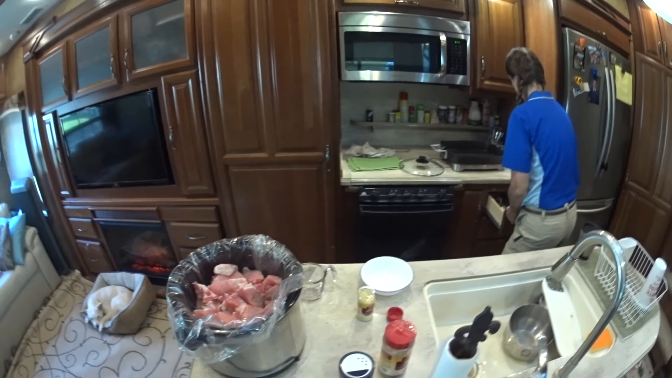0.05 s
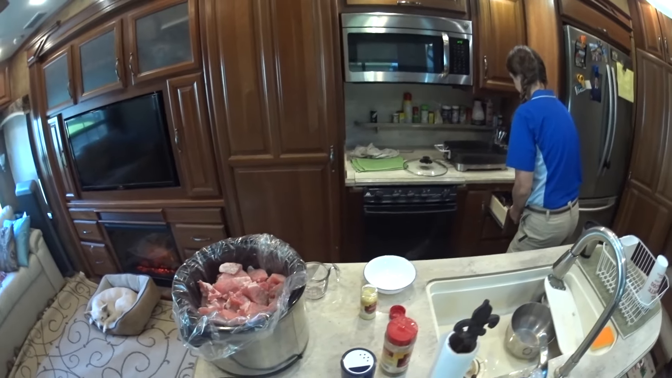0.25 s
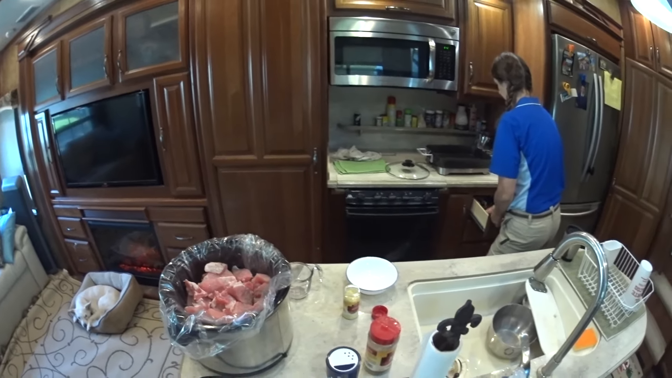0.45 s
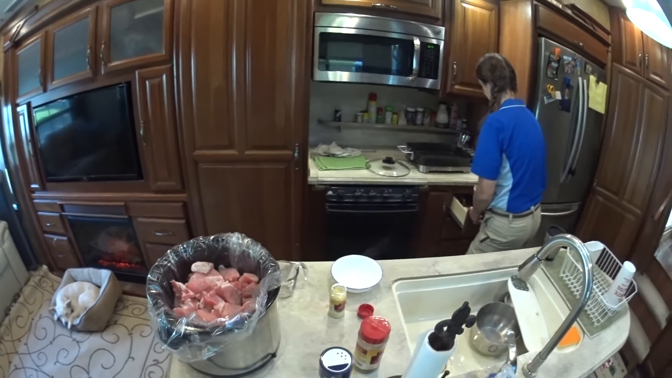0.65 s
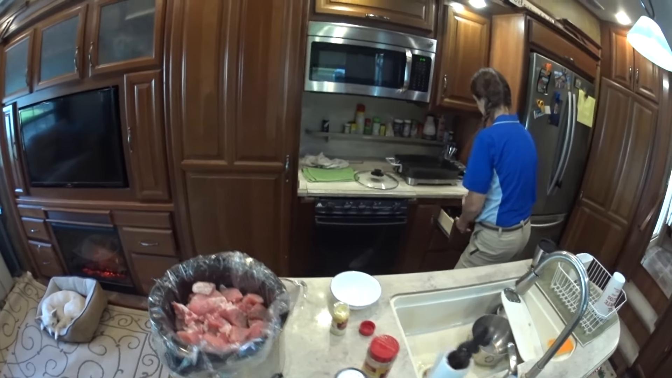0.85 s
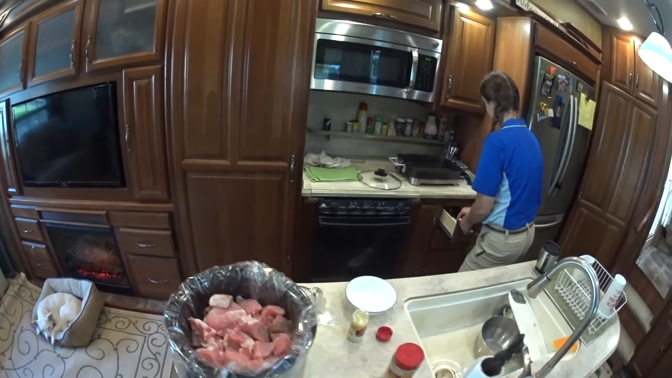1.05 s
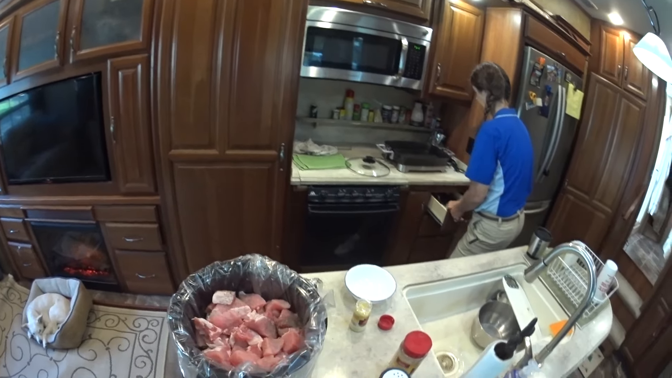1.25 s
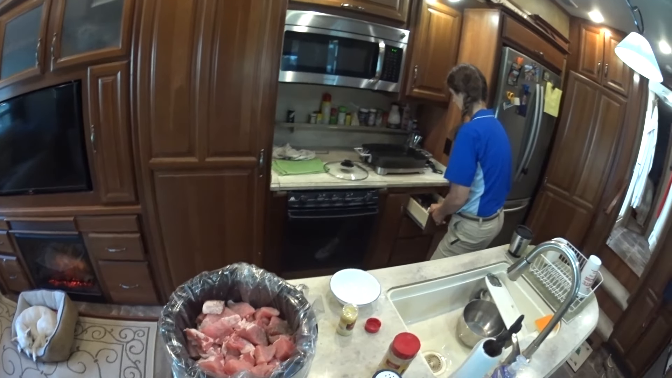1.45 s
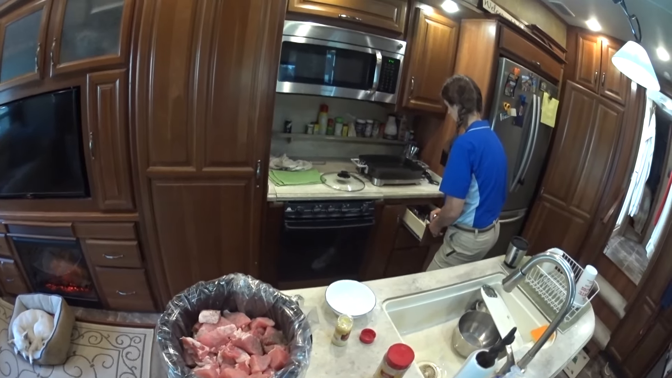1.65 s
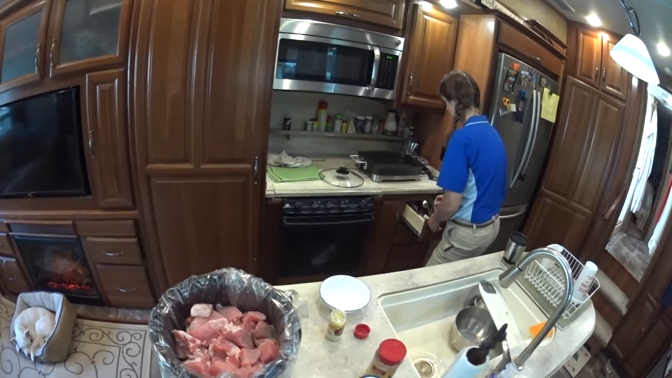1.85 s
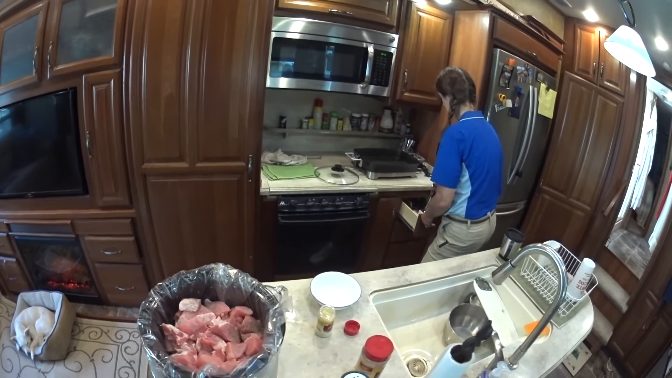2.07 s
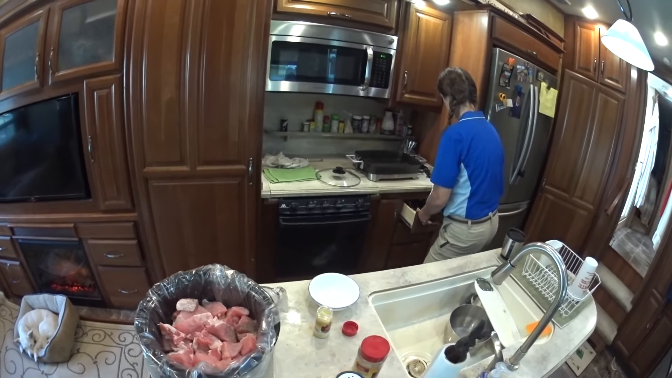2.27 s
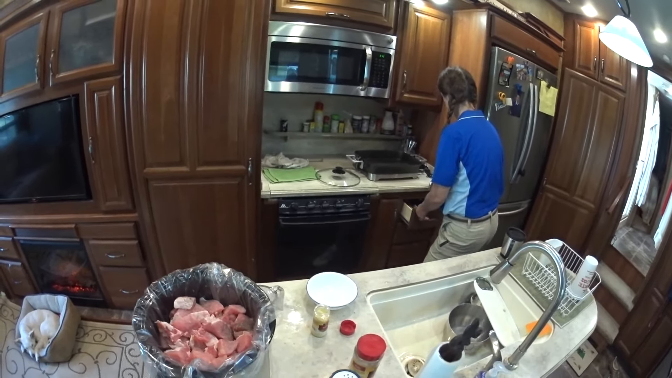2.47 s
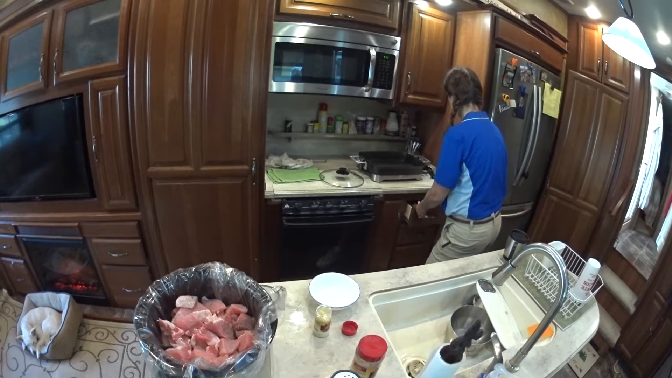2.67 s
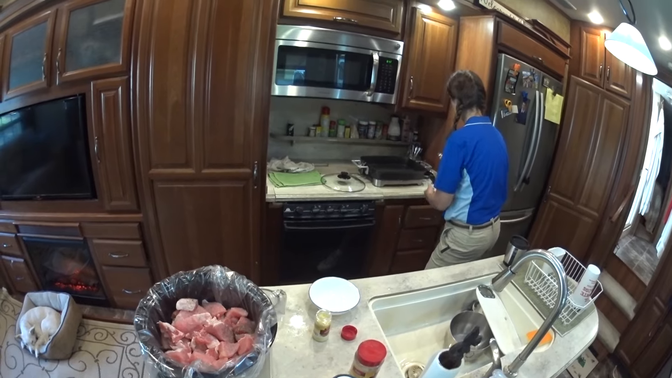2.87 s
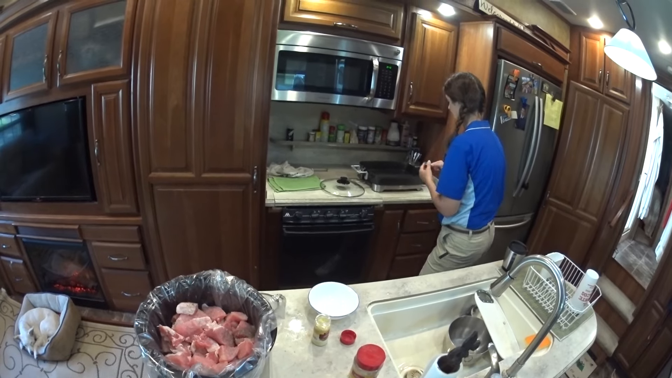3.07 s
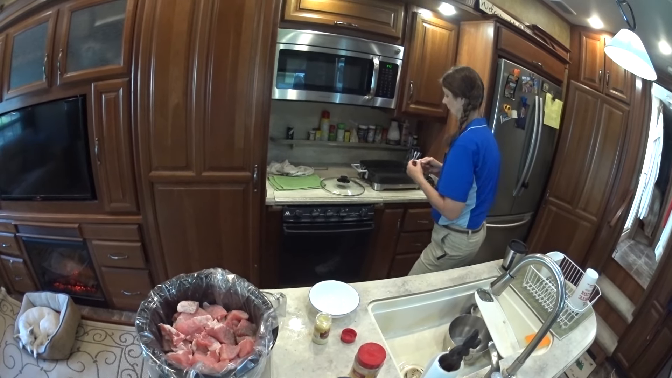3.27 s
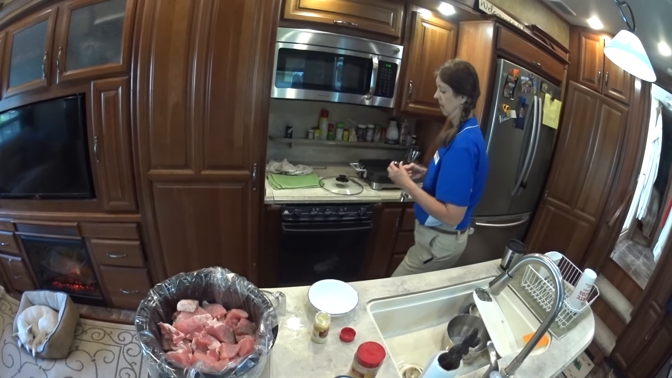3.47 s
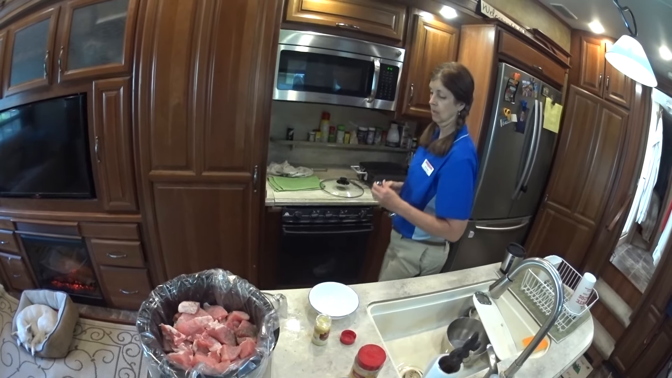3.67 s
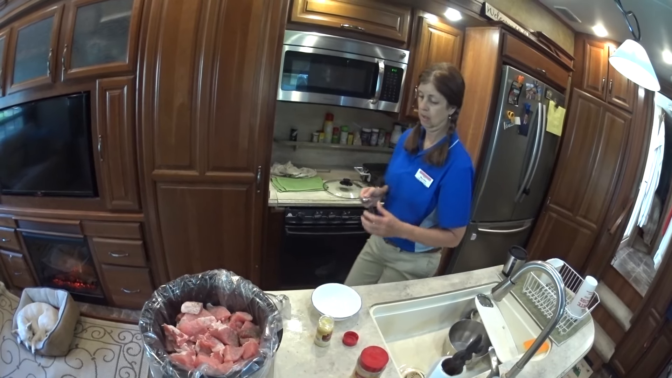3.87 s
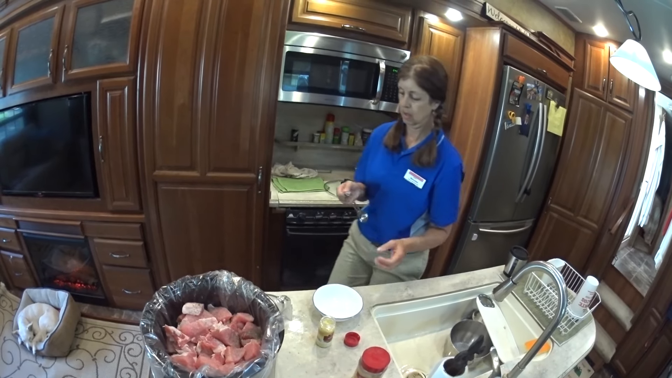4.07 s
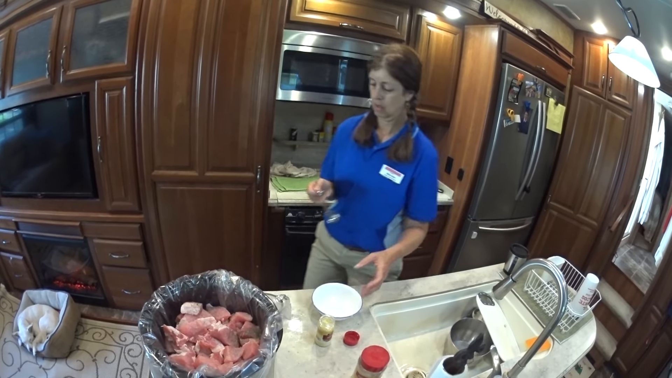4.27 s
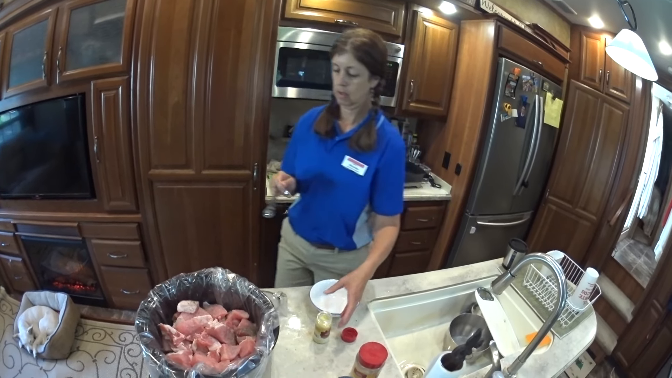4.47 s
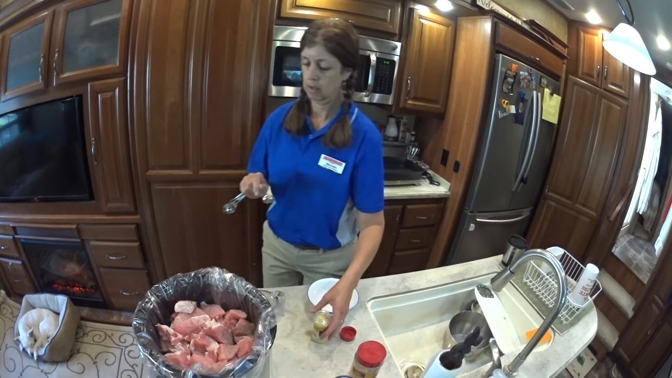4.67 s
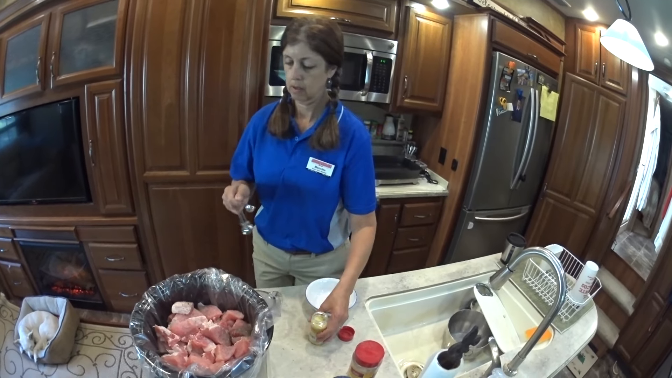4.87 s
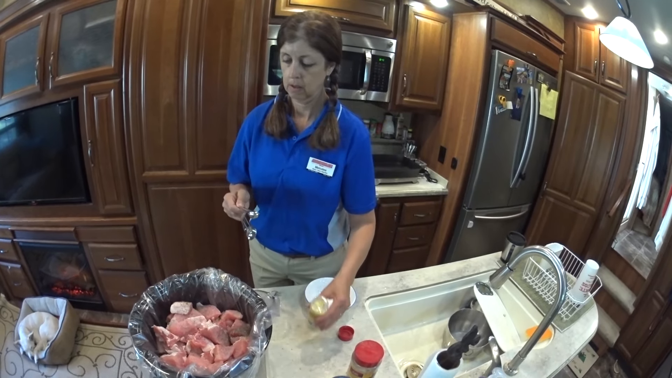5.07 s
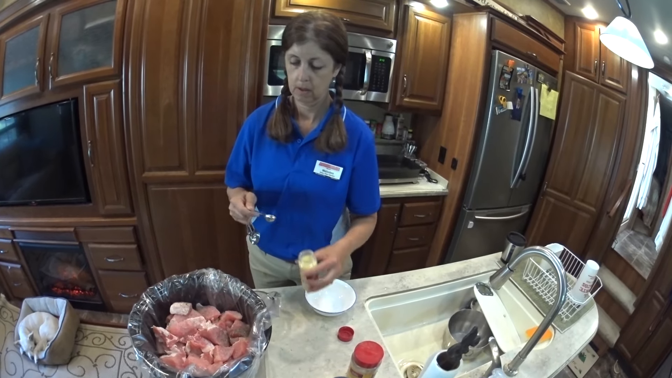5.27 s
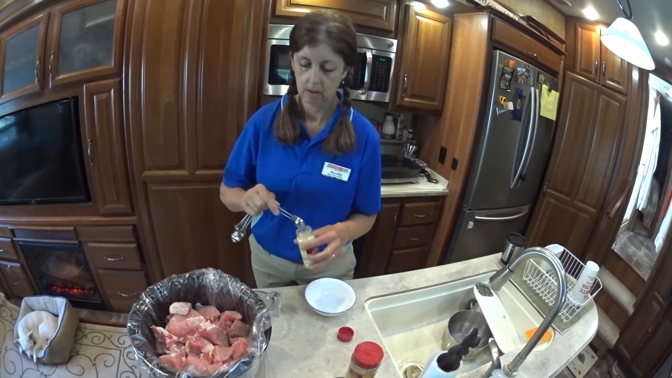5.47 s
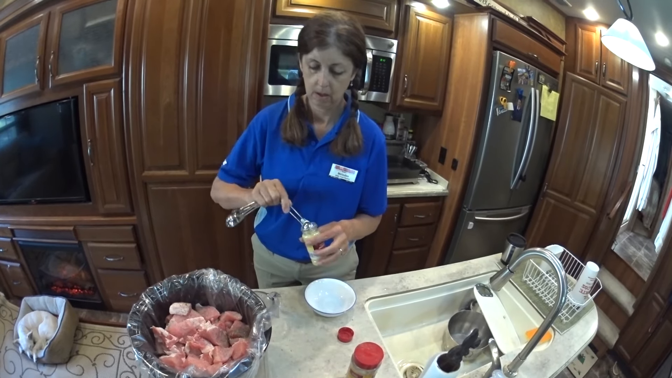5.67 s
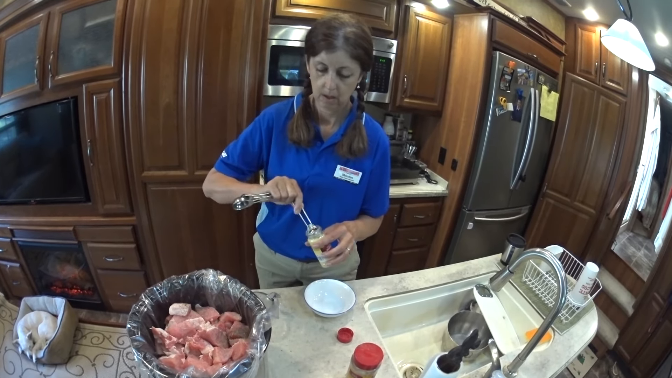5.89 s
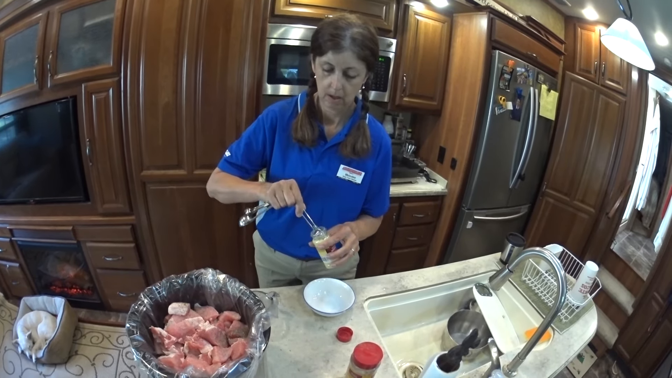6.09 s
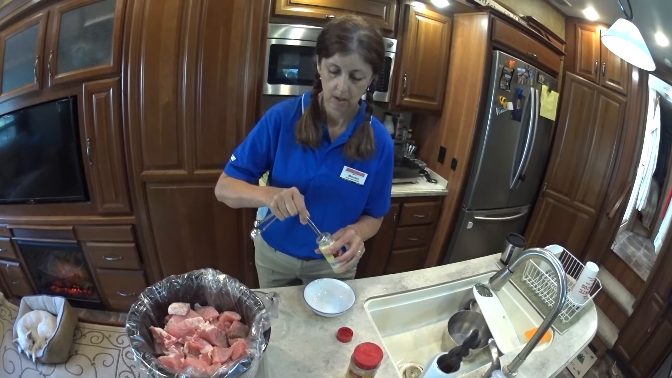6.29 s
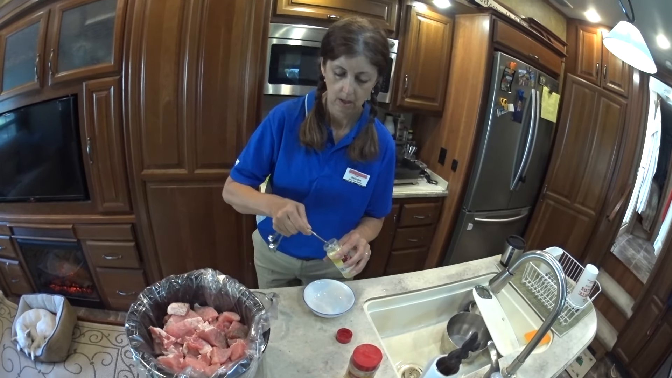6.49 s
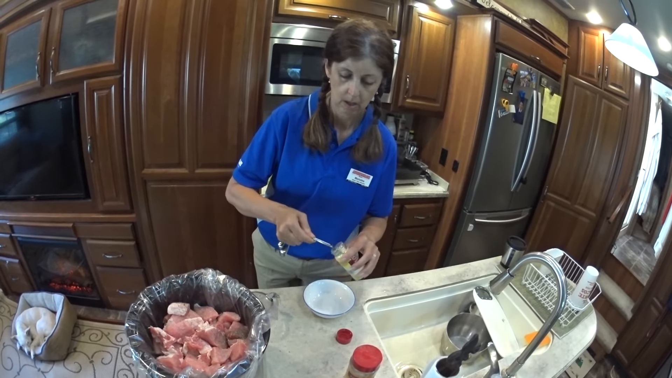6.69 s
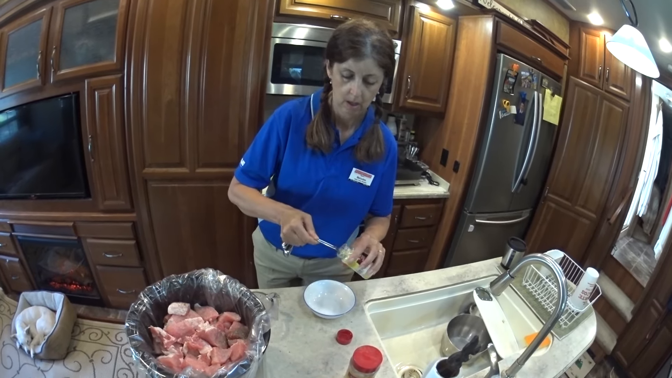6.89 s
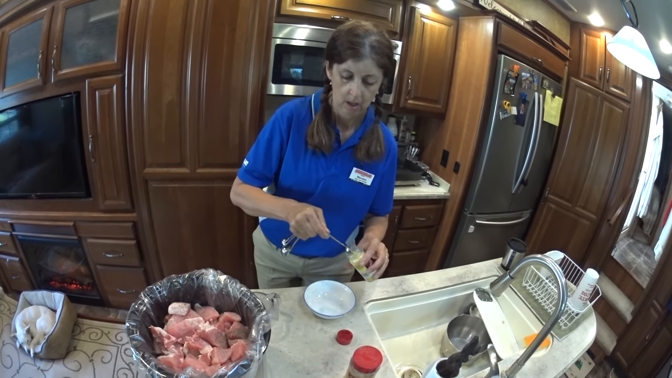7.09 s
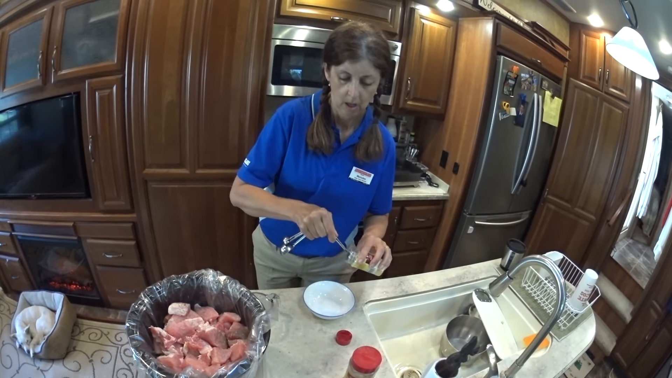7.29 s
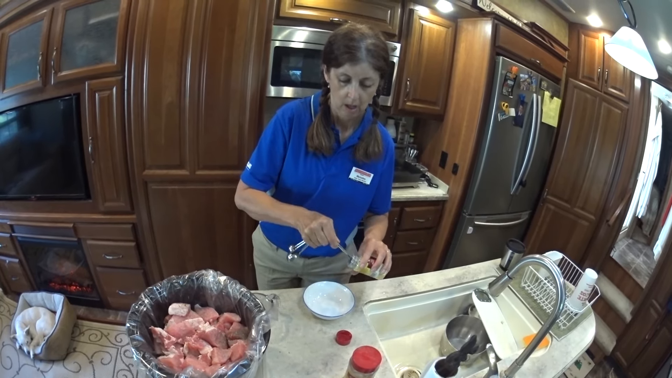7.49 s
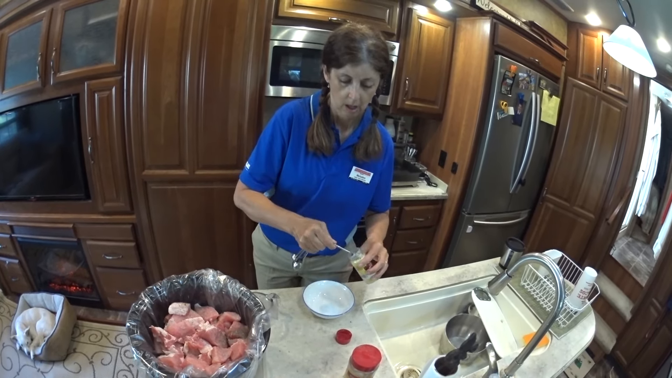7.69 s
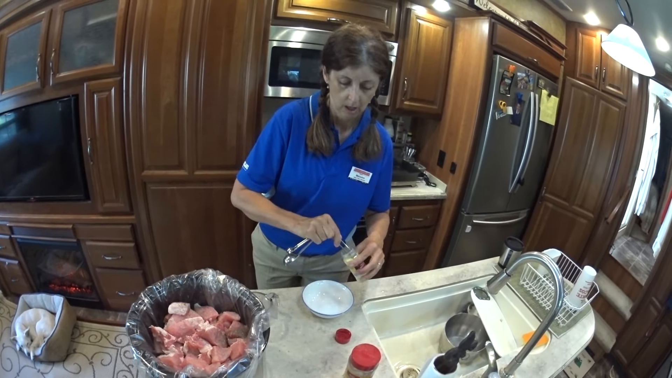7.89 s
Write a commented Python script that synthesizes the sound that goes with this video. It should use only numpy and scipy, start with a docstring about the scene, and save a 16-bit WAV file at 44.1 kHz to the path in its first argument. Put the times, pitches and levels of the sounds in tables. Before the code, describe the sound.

Loud, irregular cutlery clatter comes from a drawer across a compact kitchen, blurred by short reflections off cabinets, with clinks and hollow plastic and wooden knocks. After nearly three seconds it gives way to light jingling of measuring spoons, two soft low steps and a counter knock with rustling clothes. The rest is sparse and quiet: tiny dull glass ticks and brief pasty scraping close to the stereo microphones, over low room air.

```python
"""Steel utensils clatter in a drawer across a small wood-panelled kitchen, far from the microphones and mostly
heard off the walls: contacts and knocks ring the steel, the tray and the drawer box. A utensil swings clear and
measuring spoons jingle in the hand. Two soft steps and a knock at the counter follow as low thuds and clacks;
then, close to the microphones, a spoon ticks and scrapes in a small glass jar damped by the hand.
Cloth rustles on the way to the counter; behind it all are room air and a faint, pulsing fan, as filtered noise."""
import sys
import numpy as np
from scipy import signal
from scipy.fft import rfft, irfft
from scipy.io import wavfile
from scipy.ndimage import uniform_filter1d

SR = 44100
rng = np.random.default_rng(int(sys.argv[2]) if len(sys.argv) > 2 else 0)


def unload_audio(sound):
    """Save the sound as a 16-bit wav file, at the path given as the first command line argument."""
    columns = np.transpose(np.atleast_2d(sound))
    # keep every value between -1 and 1, then stretch to whole-number steps
    steps = np.round(np.clip(columns, -1, 1) * 32767)
    wavfile.write(sys.argv[1], SR, steps.astype(np.int16))


N = 350154
TIME = np.arange(N) / SR


def undb(db):
    """Decibels to gain."""
    return 10 ** (np.asarray(db) / 20)


def unit(x):
    """Scale to unit energy."""
    return x / np.sqrt(np.sum(x ** 2) + 1e-18)


def along(points, hz):
    """Read a (frequency [Hz], value) table on a log-frequency axis."""
    table_hz, value = np.transpose(points)
    return np.interp(np.log(hz + 1), np.log(table_hz), value)


def through(x, response):
    """Pass a signal through an impulse response."""
    return signal.oaconvolve(x, response)[:N]


def add(track, s, sound):
    """Mix a sound into a track from time s."""
    start = int(np.clip(s * SR, 0, N - 1))
    track[start:start + len(sound)] += sound[:N - start]


def body(points, size=2048):
    """Causal, quickly dying response with the given spectrum, in minimum phase."""
    hz = np.fft.rfftfreq(size, 1 / SR)
    cepstrum = irfft(np.log(undb(along(points, hz))))
    # fold the cepstrum onto positive time
    cepstrum[1:size // 2] *= 2
    cepstrum[size // 2 + 1:] = 0
    return unit(irfft(np.exp(rfft(cepstrum))))


def ring(modes, scatter_db=0, detune=0, size=12000):
    """Decaying partials; their balance and exact pitch depend on where the object is touched."""
    hz, db, t60 = np.transpose(modes)[:, :, None]
    t = np.arange(size) / SR
    hz = hz * (1 + detune * rng.standard_normal(hz.shape))
    # dividing by sqrt(t60) makes each level stand for the energy of its partial
    gain = undb(db + scatter_db * rng.standard_normal(hz.shape)) / np.sqrt(t60)
    sign = rng.choice([-1, 1], hz.shape)
    decay = np.exp(-np.log(1000) * t / t60)
    return unit(np.sum(sign * gain * decay * np.cos(2 * np.pi * hz * t), axis=0))


def chatter(db, length, count=10, size=4096):
    """A first contact and weaker rebounds, together as strong as 10 ms of sound at the given level."""
    lag = np.r_[0, rng.uniform(0, 2, count - 1)]  # in units of length [s]
    sample = np.clip(lag * length * SR, 0, size - 1).astype(int)
    force = np.zeros(size)
    np.add.at(force, sample, np.exp(-.7 * lag) * rng.choice([-1, 1], count))
    return unit(force) * undb(db) * np.sqrt(SR / 100)


def strike(db, length, response):
    """Ring a response with a chattering blow, keeping the strength of the blow."""
    force = chatter(db, length)
    return np.linalg.norm(force) * unit(signal.fftconvolve(force, response))


def contacts(per_s, spread_db, even_s=0.051):
    """A stream of random small impacts, a few far stronger than the rest; mean power about 1."""
    happens = rng.random(N) < per_s / SR
    sign = rng.choice([-1, 1], N)
    hits = happens * sign * undb(spread_db * rng.exponential(size=N).clip(0, 4))
    power = uniform_filter1d(hits ** 2, max(int(even_s * SR), 2))
    return hits / np.sqrt(np.abs(power) + 1e-9)


def gesture(middle, length):
    """A smooth movement that gathers speed and slows again."""
    return np.cos(np.pi * np.clip((TIME - middle) / length, -.5, .5))


def hiss(points):
    """Noise of power 1 with the given spectrum."""
    return through(rng.standard_normal(N), body(points))


# The hand shoves the heap of utensils:
# (start [s], length [s], relative steel rattle level [dB], relative tray clatter level [dB])
SHOVES = [(0.0, 0.002, -47, -35), (0.11, 0.015, -30.5, -31.5), (0.21, 0.0078, -35.5, -42),
          (0.257, 0.023, -42, -37.5), (0.333, 0.04, -51.5, -44), (0.39, 0.2, -41.5, -39.5),
          (0.624, 0.097, -27, -29), (0.775, 0.089, -26.5, -27.5), (0.899, 0.066, -34, -40),
          (1.224, .19, -43, -45.5), (1.445, 0.056, -46, -47), (1.341, 0.024, -42.5, -36),
          (1.528, 0.086, -28.5, -33), (1.678, 0.28, -34.5, -37), (1.89, 0.027, -27.5, -30),
          (1.967, 0.051, -35, -48.5), (2.138, 0.25, -39.5, -41.5), (2.372, 0.033, -21, -27.5),
          (2.429, .15, -25.5, -26.5), (2.604, 0.069, -31, -38.5)]


def shoving(column, settle_db_per_s, attack_s=0.0054, sag_db_per_s=13.5):
    """Strength of the shoves: a quick attack, a sagging hold, then a steady fall; their powers add."""
    power = 0
    for start, length, *db in SHOVES:
        age = np.maximum(TIME - start, 0)
        fall_db = sag_db_per_s * age + settle_db_per_s * np.maximum(age - length, 0)
        attack = np.minimum(age / attack_s, 1)
        power = power + (attack * undb(db[column] - fall_db)) ** 2
    return np.sqrt(power)


# Spectrum of steel-on-steel contact: (frequency [Hz], relative level [dB])
STEEL = [(900, -43), (2000, -7.5), (3000, 4), (4200, 4.5), (6500, 6.5), (9000, 3.5), (12500, 2.5),
         (14500, -2), (16000, -29)]
# Tones in which the cutlery rings most readily: frequency [Hz]
CUTLERY_HZ = [6603, 6810, 7470, 8048, 8882, 9023, 9502, 10180, 11070, 11915, 12496, 14831]


def any_utensil(t60, count=3):
    """A few inharmonic tones of some piece of cutlery, damped by the heap."""
    tones = np.r_[rng.choice(CUTLERY_HZ, count), rng.uniform(5500, 14500, size=count)]
    return [(hz, along(STEEL, hz), t60) for hz in tones]


def handle(t60, centre_hz=814, spread_octaves=.24):
    """The hollow note of some handle, scattered round one pitch."""
    hz = centre_hz * 2 ** (spread_octaves * rng.standard_normal())
    return ring([(hz, 0, t60)], size=4000)


# Spectrum of the hollow plastic tray: (frequency [Hz], relative level [dB])
TRAY = [(40, -42), (100, -22.5), (150, -16), (200, -13.5), (270, -0.5), (325, 5.5), (420, -1.5), (520, -5),
        (720, 0.5), (1000, 1.5), (1650, -1), (2200, -4.5), (4000, -13), (9000, -21)]
# Resonances of the drawer box: (frequency [Hz], relative energy [dB], t60 [s])
BOX_MODES = [(235, -10, .12), (324, 2, .22), (364, -3, .18), (460, -9, .12), (570, -3, .15), (684, -1, .14),
             (797, -4, .13), (1140, -7, .1), (1638, -10, .1)]


def tray(force, box_db=-5):
    """The plastic tray takes the blow and the wooden drawer box under it resonates."""
    return through(force, body(TRAY)) + undb(box_db) * through(force, ring(BOX_MODES))


def rummage(steel_gain, tray_gain, steel_db=-11, tray_db=-8.5, ring_db=-5, ring_t60=0.07,
            handle_db=-9, handle_t60=.04, count=60):
    """One part of the heap is pushed about: contacts click, rattle the tray and set ever other utensils ringing."""
    out = undb(steel_db) * through(steel_gain * contacts(260, 1.8), body(STEEL))
    out += tray(undb(tray_db) * tray_gain * contacts(45, 1.8, even_s=0.077))
    last_start, last_length = SHOVES[-1][:2]
    times = np.linspace(0, last_start + last_length, count) + rng.uniform(0, .04, count)
    for s in times:
        now = int(s * SR)
        tones = ring(any_utensil(ring_t60), scatter_db=6, size=6000)
        add(out, s, steel_gain[now] * strike(ring_db, .002, tones))
        add(out, s, tray_gain[now] * strike(handle_db, 0.001926, handle(handle_t60)))
    return out


# The hardest knocks between single utensils, levels relative within each column:
# (time [s], click level [dB], standout ring [Hz], standout ring level [dB], handle knock level [dB])
CLASHES = [(0.003, -25.5, 7380, -53, -36.5), (0.1217, -27.5, 7470, -31, -43),
           (0.2228, -28, 10400, -35, -33), (0.3821, -46, 8910, -54, -32.5), (0.4343, -31, 6500, -44, -33),
           (0.4733, -33, 6150, -52, -31), (0.534, -31.5, 6670, -45, -30.5), (0.6, -34, 6280, -32, -28),
           (0.6314, -40, 9750, -38, -28), (0.7822, -27, 6400, -45, -26), (0.8206, -12.5, 7470, -18, -32),
           (0.9648, -26.5, 7470, -34, -65), (1.2359, -43, 8900, -40, -38), (1.2779, -30, 12200, -56.5, -36),
           (1.3255, -29, 6800, -36, -42.5), (1.3777, -30.5, 6490, -48, -33.5),
           (1.5339, -18, 8910, -33, -45), (1.5536, -32, 8840, -46, -29.5), (1.6102, -42, 6800, -45, -28.5),
           (1.7953, -20.5, 6620, -24.5, -31), (1.81, -19, 9020, -16.5, -56.5),
           (1.8778, -18.5, 11070, -18, -25), (1.924, -32, 8880, -21.5, -32),
           (2.0395, -25.5, 9500, -61, -40), (2.1144, -17.5, 8250, -32.5, -40),
           (2.2542, -27, 6900, -43.5, -54), (2.2877, -28, 8100, -27.5, -40.5),
           (2.3776, -21, 8260, -47, -25), (2.5825, -33, 6810, -47, -28)]


def clashes(click_db=-10, ring_db=-18, ping_db=-9, tray_db=-2.0, handle_db=-2, handle_t60=0.049,
            t60=.13, ping_t60=0.081, bump_db=8, bump_octaves=.35, length=0.007,
            graze_s=0.0028, graze_db=-22):
    """Harder knocks within the heap: a bright click and tones from the steel, a hollow note from the handle."""
    metal, thumps = np.zeros((2, N))
    grid = np.geomspace(500, 16000, 30)  # Hz
    for s, db, bright_hz, tone_db, knock_db in CLASHES:
        # the click is strongest round the standout ring
        bump = bump_db * np.exp(-(np.log2(grid / bright_hz) / bump_octaves) ** 2)
        click = body(np.c_[grid, along(STEEL, grid) + bump])
        # the pieces graze just before they meet squarely
        add(metal, s - graze_s, strike(db + graze_db, length, click))
        add(metal, s, strike(db + click_db, length, click))
        tones = ring(any_utensil(t60), scatter_db=7.5, size=8000)
        add(metal, s, strike(db + ring_db, length, tones))
        ping = ring([(bright_hz, 0, ping_t60)])
        add(metal, s, strike(tone_db + ping_db, 0.0048, ping))
        add(metal, s, strike(knock_db + handle_db, 0.002024, handle(handle_t60)))
        add(thumps, s, chatter(knock_db + tray_db, 0.0036))
    return metal + tray(thumps)


# The utensil that swings clear: (time [s], click level [dB], ring level [dB])
LIFT = [(2.743, -51, -34), (2.753, -41.5, -27.5), (2.768, -40, -32), (2.808, -41, -39)]
# Its free resonances: (frequency [Hz], relative energy [dB], t60 [s])
LIFT_MODES = [(1635, -21, .3), (1960, -11.5, .45), (3176, -16, .3), (3709, -15, .28), (5001, -7.5, .35),
              (5722, -9, .38), (6810, -5, .22), (7397, -9, .16), (8050, -13, .24), (8770, -8, .2),
              (9507, 0, .26), (11210, -11, .22), (11920, -9, .2), (13120, -16, .2)]


def lifted():
    """One utensil glances off its neighbours and rings freely in the air."""
    out = np.zeros(N)
    for s, blow_db, tone_db in LIFT:
        tones = ring(LIFT_MODES, scatter_db=2, size=20000)
        add(out, s, strike(tone_db, 0, tones))
        add(out, s, strike(blow_db, 0.0027, body(STEEL)))
    return out


# Measuring spoons swinging on their ring, levels relative within each column:
# (time [s], slap level [dB], ping [Hz], ping level [dB])
JINGLES = [(2.9526, -29.5, 6030, -43), (3.0175, -28.5, 6540, -32.5), (3.032, -31.5, 5745, -32),
           (3.069, -31, 5770, -34), (3.1155, -34, 5740, -49), (3.272, -38, 7510, -55.5),
           (3.382, -34, 6830, -46), (3.405, -32.5, 5825, -31.5), (3.468, -34, 5720, -41.5),
           (3.488, -26.5, 6530, -39), (3.541, -28, 5725, -27), (3.559, -23, 5800, -48),
           (3.6947, -21.5, 7540, -35), (3.7065, -22, 7510, -45), (3.7585, -38, 5720, -38.5),
           (3.8274, -35.5, 6270, -41)]
# Resonances of the nested spoons: (frequency [Hz], relative energy [dB], t60 [s])
SPOON_MODES = [(3276, 6.5, 0.048), (5800, -17, .08), (6040, -15, 0.11), (6280, -1.5, 0.17),
               (6400, 13, 0.12), (7510, 5.5, 0.051), (8720, 10, 0.048), (9520, 10.5, 0.034),
               (10500, 11, .08), (11330, 13, 0.033), (11900, 8.5, 0.11), (12000, 16.5, .08), (13400, 0, .1)]
# Spectrum of their click: (frequency [Hz], relative level [dB])
SPOON_CLICK = [(200, -31.5), (1200, -9.5), (2200, -18), (3200, 3), (4400, -6), (6100, 9.5), (8000, 0),
               (10000, 0.5), (11500, -14), (14000, 1), (16000, -14)]


def spoons(click_db=-10, ring_db=-12, ping_db=-3, graze_db=-15, graze_s=0.0035, ring_scatter_db=4,
           chatter_s=.012, ping_t60=0.1):
    """The nested spoons graze, slap together and rebound, damping one another; one of them pings on."""
    out = np.zeros(N)
    for s, db, ping_hz, tone_db in JINGLES:
        add(out, s - graze_s, strike(db + graze_db, chatter_s, body(SPOON_CLICK)))
        add(out, s, strike(db + click_db, chatter_s, body(SPOON_CLICK)))
        tones = ring(SPOON_MODES, scatter_db=ring_scatter_db, detune=0.023, size=6000)
        add(out, s, strike(db + ring_db, chatter_s, tones))
        add(out, s, strike(tone_db + ping_db, 0.0027, ring([(ping_hz, 0, ping_t60)])))
    return out


# Dull blows on floor, drawer front and counter:
# (time [s], relative thud level [dB], relative clack level [dB])
THUDS = [(3.038, -79, -49.5), (3.086, -73, -49.5), (3.125, -62, -57), (4.273, -49.5, -62.5),
         (4.456, -52.5, -66), (4.608, -67, -69), (4.847, -43.5, -47.5), (4.856, -50.5, -47.5),
         (4.871, -57, -53), (4.888, -61, -76)]
# Spectrum of the soft boom: (frequency [Hz], relative level [dB])
THUD = [(30, -19), (90, -11), (160, 2), (240, -4.5), (380, -11), (600, -24), (2000, -41)]
# Spectrum of the harder clack: (frequency [Hz], relative level [dB])
CLACK = [(30, -33), (100, -5), (350, -2.5), (950, 1.5), (1700, -6.5), (3500, -10.5), (7000, -21.5),
         (15000, -41)]


def thuds(thud_db=3, clack_db=1):
    """Soft blows boom in the hollow floor and cabinets; harder ones clack as well."""
    soft, hard = np.zeros((2, N))
    for s, low_db, high_db in THUDS:
        add(soft, s, chatter(low_db + thud_db, .001, count=1))
        add(hard, s, chatter(high_db + clack_db, 0.0081))
    return through(soft, body(THUD)) + through(hard, body(CLACK))


# Spoon against the hand-held jar, levels relative within each column:
# (time [s], tick level [dB], knock level [dB], added ring [Hz])
TAPS = [(5.224, -51.5, -70, 8000), (5.5854, -50.5, -48, 10300), (5.6383, -54, -60.5, 6400),
        (5.7089, -47, -51.5, 8370), (6.3355, -53.5, -69.5, 6400), (6.425, -44.5, -58, 6400),
        (6.5668, -43, -61.5, 8200), (6.677, -58, -60.5, 5000), (7.2087, -44, -51.5, 5400),
        (7.8093, -35.5, -54.5, 1430), (7.8163, -39, -55.5, 4600), (7.842, -54, -68, 4650)]
# Strokes of the spoon round the jar, levels relative within each column:
# (middle [s], length [s], gritty scrape level [dB], soft rubbing level [dB], singing glass level [dB])
STROKES = [(6.66, 0.11, -77, -66.5, -81), (6.755, 0.084, -71, -63, -68), (6.815, 0.041, -69, -66, -70),
           (6.95, 0.38, -86, -72, -88), (7.313, 0.08, -77, -88.5, -84)]
# Spectrum of tick and gritty scrape: (frequency [Hz], relative level [dB])
TICK = [(800, 4), (1800, -19), (2600, 2), (4500, 1.5), (8300, -3), (12500, -8), (16000, -24)]
# Spectrum of the knock: (frequency [Hz], relative level [dB])
KNOCK = [(40, -39), (120, -17.5), (300, 6.5), (600, -7), (900, 4.5), (1280, 1), (1800, -12), (2500, 0),
         (3500, -14.5), (8000, -19.5)]
# Glass damped by the hand: (frequency [Hz], relative energy [dB], t60 [s])
JAR_MODES = [(1400, -2, .025), (2550, -1, .02), (3400, -2, .025), (4600, -3, .02), (5000, -5, .018),
             (6400, -5, .02), (8250, -5, .02), (10400, -11, .03)]
# Spectrum of the soft rubbing of hand and cloth: (frequency [Hz], relative level [dB])
RUB = [(40, -29), (140, -3), (280, 4), (500, -13.5), (1100, -5.5), (2500, -18.5), (8000, -29)]


def jar(tick_db=-13, glass_db=-16, bright_db=5, bright_t60=0.021, scrape_db=-2, sing_db=-3):
    """The spoon ticks on the glass, which the hand damps at once, and scrapes round it to a soft rubbing of
    hand and cloth."""
    out = np.zeros(N)
    for s, high_db, low_db, bright_hz in TAPS:
        add(out, s, strike(high_db + tick_db, 0.00098, body(TICK)))
        modes = JAR_MODES + [(bright_hz, bright_db, bright_t60)]
        glass = ring(modes, scatter_db=8, size=4000)
        add(out, s, strike(high_db + glass_db, 0, glass))
        add(out, s, strike(low_db, 0, body(KNOCK)))
    grit, rub, sing = sum(np.outer(undb(db), gesture(s, length)) for s, length, *db in STROKES)
    out += through(undb(scrape_db) * grit * contacts(510, 3.6), body(TICK))
    out += through(rub * contacts(560, 2.2), body(RUB))
    singing_glass = ring([(4100, 0, 0.054)])
    return out + through(undb(sing_db) * sing * contacts(900, 2.2), singing_glass)


def widen(mid, other, width):
    """Left and right from a shared part and an unrelated part."""
    hz = np.fft.rfftfreq(len(other), 1 / SR)
    side = irfft(rfft(other) * undb(along(width, hz)), len(other))
    return np.array([mid + side, mid - side])


# Width of reflections at the closely spaced microphones: (frequency [Hz], side minus mid [dB])
WIDTH = [(60, -18), (110, -9), (200, -27), (380, -11.5), (700, -10), (1290, -4.5), (2380, 0), (4400, -5.5),
         (8120, -19), (15000, -35)]
# Decay of the kitchen: (frequency [Hz], t60 [s])
ROOM_T60 = [(150, 0.2), (1000, 0.34), (5000, 0.3), (14000, 0.21)]


def room(x, wet_db, pan_db, side_db, size=22050):
    """Direct sound, then dense reflections off the cabinets, dying at their own rate in each octave."""
    t, hz = np.arange(size) / SR, np.fft.rfftfreq(size, 1 / SR)
    octave = np.round(np.log2(np.maximum(hz, 2 ** 7)))
    noise = rfft(rng.standard_normal((2, size)))
    tail = 0
    for k in np.unique(octave):
        decay = np.exp(-np.log(1000) * t / along(ROOM_T60, 2 ** k))
        tail = tail + irfft(noise * (octave == k)) * decay
    tail = tail * (1 - np.exp(-t / 0.001))  # reflections build up over about a millisecond
    response = undb(wet_db) * widen(unit(tail[0]), undb(side_db) * unit(tail[1]), WIDTH)
    response[:, 0] += 1  # direct sound
    left, right = (through(x, unit(h)) for h in response)
    return np.array([left * undb(pan_db / 2), right * undb(-pan_db / 2)])


# Clothes rustling on the way to the counter: (middle [s], length [s], relative level [dB])
RUSTLES = [(3.964, 1, -66), (4.288, 0.098, -72), (4.466, .025, -66), (4.595, 0.7, -68.5),
           (4.912, .16, -61.5)]
# Spectrum of the still room: (frequency [Hz], relative level per Hz [dB])
AIR = [(15, -45), (25, -7), (66, 0.5), (173, -7.5), (399, -3), (457, -5.5), (523, -7.5), (567, -11),
       (614, -7.5), (1660, -13), (2560, -14), (4380, -19), (15500, -22)]
# Width of the background at the microphones: (frequency [Hz], side minus mid [dB])
AIR_WIDTH = [(60, -21), (110, -12), (200, -7.5), (380, -4.5), (700, 1), (1290, 4), (2380, -2.5), (4400, 0),
             (8120, -5.5), (15000, -33.5)]


def background(air_db=-70.5, whirr_db=-73, whirr_hz=2580, width_hz=420, rustle_db=-4):
    """Room air, rustling cloth and a fan whose whirr, a band of noise, swells once a turn."""
    turn_s, loudest_s = .2395, 4.055
    swell = (.5 + .5 * np.cos(2 * np.pi * (TIME - loudest_s) / turn_s)) ** .7
    band = [(whirr_hz - width_hz, -40), (whirr_hz - width_hz / 2, -2), (whirr_hz, 0),
            (whirr_hz + width_hz / 2, -3), (whirr_hz + 2 * width_hz, -40)]
    cloth = [(100, 1), (400, 4.5), (1500, -3.5), (6000, -5.0), (15000, -9.5)]
    movement = sum(undb(db) * gesture(s, length) for s, length, db in RUSTLES)

    def layer():
        """One independent draw of air, whirr and cloth."""
        air = undb(air_db) * hiss(AIR)
        whirr = undb(whirr_db) * swell * hiss(band)
        return air + whirr + undb(rustle_db) * movement * hiss(cloth)

    return widen(layer(), layer(), AIR_WIDTH)


def scene(count=3):
    """The drawer is far off and screened by the body, so it is mostly heard off the walls; the jar is near."""
    steel_gain = shoving(0, settle_db_per_s=282)
    tray_gain = shoving(1, settle_db_per_s=315)
    heap = [clashes()] + [rummage(steel_gain, tray_gain) for _ in range(count)]
    # each part of the heap reaches the microphones by its own set of reflections
    drawer = sum(room(part, wet_db=4.5, pan_db=-0.8, side_db=-3.5) for part in heap)
    in_hand = room(spoons(), wet_db=-1, pan_db=-0.6, side_db=-1.5)
    in_hand += room(lifted(), wet_db=1.5, pan_db=-0.3, side_db=-2)
    counter = room(thuds(), wet_db=3, pan_db=-0.4, side_db=-4.0)
    counter += room(jar(), wet_db=-4.5, pan_db=0.8, side_db=-0.5)
    return drawer + in_hand + counter + background()


def record(dry, limit_db=-29, ratio=3, window_s=0.0068, ceiling=.19, top_hz=15600):
    """Gain control holds the loudest clatter down and rounds its peaks; the top of the treble is cut."""
    power = uniform_filter1d(np.mean(dry ** 2, axis=0), max(int(window_s * SR), 2))
    over = np.maximum(np.sqrt(np.abs(power)) / undb(limit_db), 1)
    held = dry * over ** (1 / ratio - 1)
    rounded = ceiling * np.tanh(held / ceiling)
    treble_cut = signal.ellip(8, .2, 70, top_hz, fs=SR, output="sos")
    return signal.sosfilt(treble_cut, rounded)


dry = scene()
out = record(dry)
unload_audio(out)
```